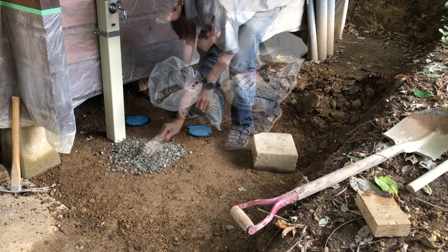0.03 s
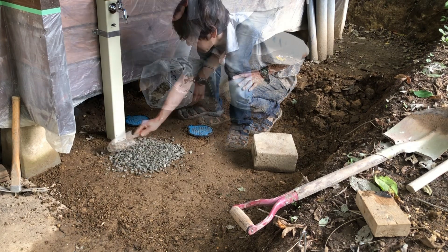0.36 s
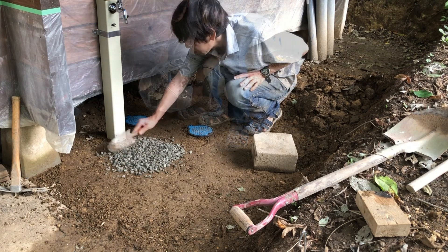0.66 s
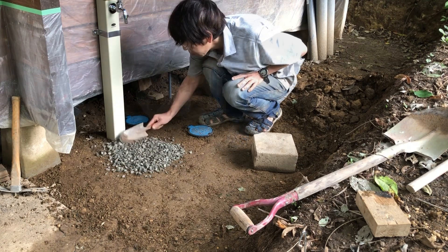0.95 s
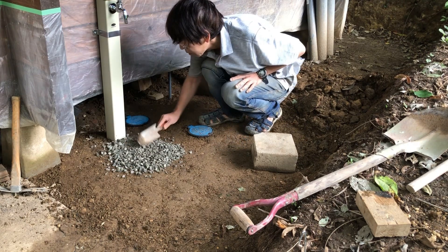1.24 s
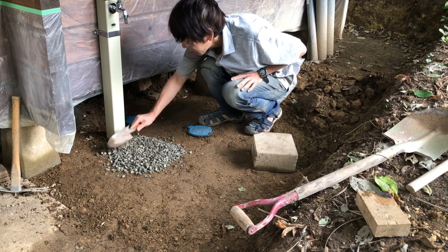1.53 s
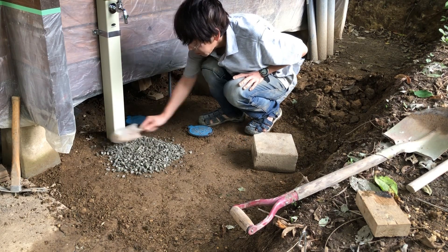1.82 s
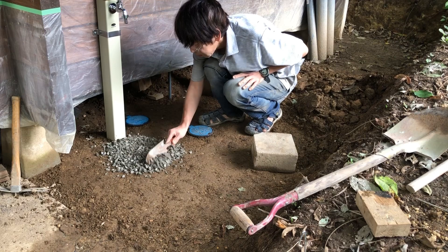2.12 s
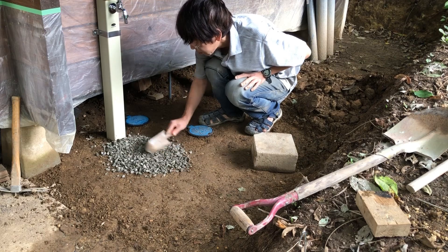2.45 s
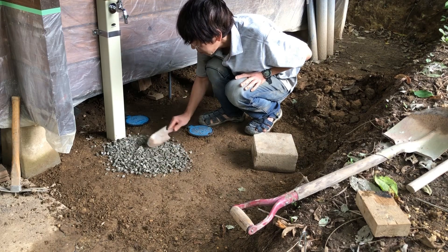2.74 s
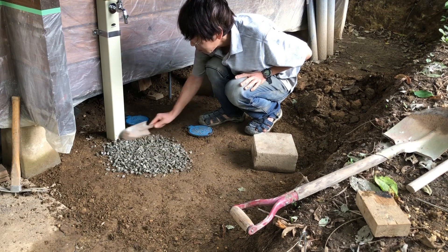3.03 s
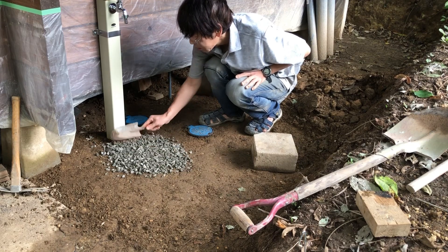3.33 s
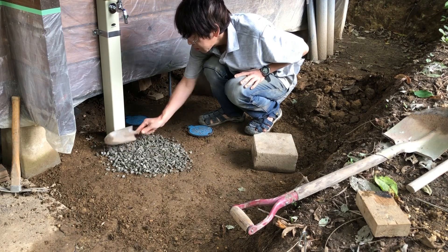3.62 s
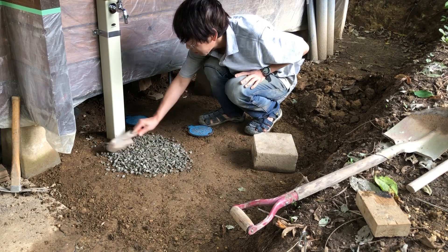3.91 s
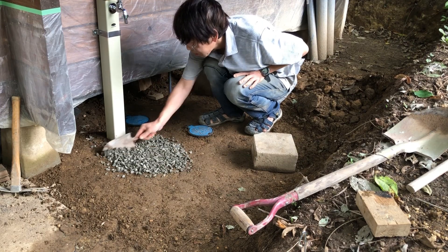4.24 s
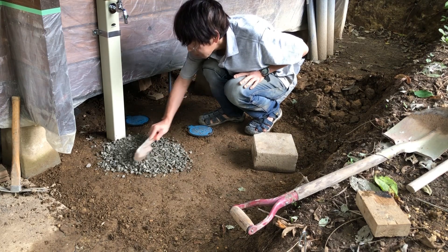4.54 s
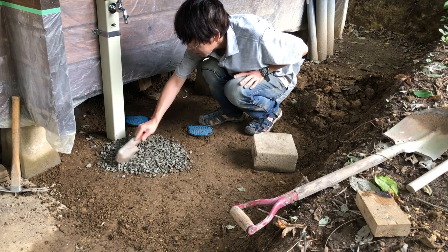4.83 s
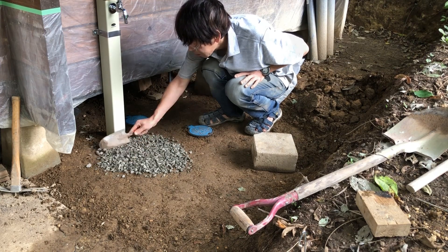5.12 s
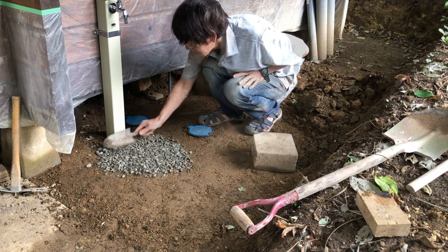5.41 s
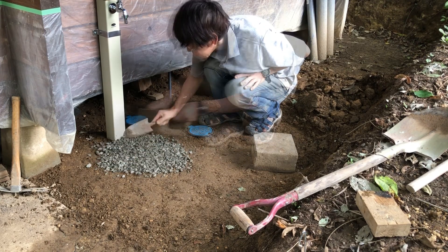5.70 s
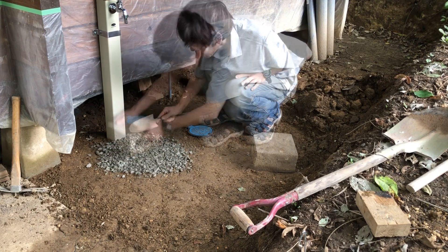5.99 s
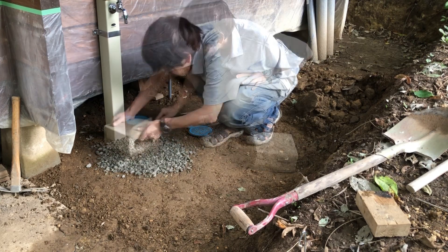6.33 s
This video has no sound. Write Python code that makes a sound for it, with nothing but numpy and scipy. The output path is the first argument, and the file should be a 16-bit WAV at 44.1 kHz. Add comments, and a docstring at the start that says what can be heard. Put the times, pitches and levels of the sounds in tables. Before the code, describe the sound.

Gravel crunches and clinks under repeated trowel strokes outdoors, with a few hollow knocks on a plastic post and one dull thud.

```python
"""Trowel spreading gravel

A steel hand trowel works a heap of crushed gravel beside a house wall, in quiet outdoor air.
Stones clack on the steel, then crunch in tiny avalanches while the dragged blade rings and chatters.
Grit trickles, soles shuffle, and now and then the trowel knocks a hollow plastic post.
The wall returns a short echo; near the end something heavy thuds on the soil."""
import sys
import numpy as np
from scipy import signal
from scipy.fft import rfft, irfft, next_fast_len
from scipy.io import wavfile
from scipy.ndimage import map_coordinates

SR = 44100
rng = np.random.default_rng(int(sys.argv[2]) if len(sys.argv) > 2 else 0)


def dump(signal):
    """Clip the signal to [-1, 1] and save it as 16-bit WAV at the path in sys.argv[1]."""
    limited = np.clip(np.atleast_2d(signal).T, -1, 1)
    pcm = np.round(limited * 32767).astype(np.int16)
    wavfile.write(sys.argv[1], SR, pcm)


N = 284886

# colour of the outdoor air: f/Hz, level/dB
AIR_COLOUR = [(20, -19), (40, -9.5), (65, 0.5), (120, 1), (200, -8), (400, -8.5), (800, -13), (1600, -16.5),
              (3000, -24), (8000, -40), (16000, -49)]
# decay of the yard's echo: f/Hz, t60/s
YARD_DECAY = [(100, 0.96), (500, 0.24), (3000, 0.25), (9000, 0.22), (16000, 0.22)]
# soles shifting on loose soil: t/s, length/s, level/dB
SOLE_SHIFTS = [(0.0, 0.081, -53), (.25, 0.23, -52), (0.51, .1, -51.5), (3.352, 0.075, -57),
               (4.815, 0.086, -60.5), (5.283, 0.13, -60.5)]
# colour of the shuffling: f/Hz, level/dB
SOLE_COLOUR = [(40, -25), (110, -4.5), (250, 4), (500, -6.5), (800, -1), (1300, 1), (2200, -6.5),
               (5000, -13), (16000, -19)]
# dull blows on the soil: t/s, shake level/dB, puff level/dB
SOIL_THUDS = [(6.129, -28.5, -38.5)]
# modes of the soil under a heavy blow: f/Hz, level/dB, t60/s
SOIL_MODES = [(59.7, -0.5, 0.46), (75, -1, 0.23), (112.6, -7, 0.17), (192, -25, 0.25)]
# the trowel hitting the post: t/s, level/dB, depth/dB, edge/dB
POST_KNOCKS = [(0.819, -36, -31, -7.5), (0.834, -40, -31, -5), (0.861, -32, -29, -11),
               (3.443, -9.5, -24.5, -34.5), (4.136, -15, -14.5, -27), (5.785, -30, -53, -6.5),
               (5.79, -26.5, -26, -11), (5.807, -21, -22.5, -24), (5.812, -27.5, -12.5, -26)]
# modes of the hollow post: f/Hz, level/dB, t60/s
POST_MODES = [(241.7, -9, 0.1), (302, -10.5, 0.11), (392, -11.5, 0.059), (606, -14, 0.056),
              (775, -0.5, 0.034), (1020, 0, 0.027), (1250, -7.5, 0.065), (1424, 5, 0.021), (1580, 2, 0.035)]
# colour of the post's loose rattle against the wall: f/Hz, level/dB
RATTLE_COLOUR = [(50, -48), (150, 1.5), (270, 11), (400, 4.5), (550, -15), (850, 7), (1150, -11),
                 (1700, -4), (2400, -16.5), (8000, -51)]
# colour of the trowel's edge catching the plastic: f/Hz, level/dB
EDGE_COLOUR = [(200, -34), (700, -35), (1150, 5.5), (1600, 8), (2400, -3.5), (3200, -9.5), (4500, -13),
               (7000, -19), (16000, -34)]
# modes of the steel blade: f/Hz, level/dB, t60/s
BLADE_MODES = [(1160, -14.5, 0.17), (1617, -12, 0.057), (1650, -15, 0.023), (2043, -7.5, 0.14),
               (2730, -31, 0.19), (3143, -15, 0.49), (3220, -2, 0.16), (3314, 0.5, 0.15), (3620, -16, 0.23),
               (3778, 3.5, 0.055), (3950, -14, 0.029), (4362, 9.5, 0.03), (4370, -3.5, 0.037),
               (5070, -3.5, 0.041), (7000, -11, .02), (8110, 2, 0.013), (9460, 5, 0.016)]
# colour of the blade flexing on the stones: f/Hz, level/dB
FLEX_COLOUR = [(300, -59.5), (900, -30), (1180, -9), (1450, -21), (1590, -1), (1665, 8), (1760, 2.5),
               (1880, -8), (2030, -11), (2400, -28), (5000, -52)]
# steel striking single large stones: t/s, level/dB, brightness/dB
STONE_HITS = [(.169, -17, -5), (.3586, -19.5, -26), (.6577, -8, -12), (.67, -16, -2.5), (.7108, -12, -6),
              (.9068, -16.5, -8.5), (.9401, -8.5, -15), (1.0382, -7, -41), (1.1356, -25, -3),
              (1.2373, -17, -4.5), (1.3172, -14, -6.5), (1.3458, -19, -14), (1.4666, -13, -10),
              (1.513, -11, -19), (1.5315, -13, -19), (1.6357, -31.5, -9), (1.7609, -14, -2),
              (1.8218, -2.5, -12.5), (1.8277, -3.5, -16), (2.0441, -1.5, -9), (2.1595, -17, -11),
              (2.2989, -16, -8.5), (2.366, -19.5, -4.5), (2.395, -21, -4.5), (2.4457, -11, -5),
              (2.4876, -19, -1.5), (2.516, -11, -16), (2.5483, -11, -2), (2.5867, -13, -19),
              (2.809, -8.5, -13), (2.849, -19, -7), (2.8683, -3, -12), (2.9102, -7.5, -20),
              (2.9622, -18, -13), (3.043, -26, -24), (3.0572, -20, -10), (3.2268, -17, -29),
              (3.3183, -22, -17), (3.3338, -13.5, -18), (3.481, -15.5, -10.5), (3.5597, -19.5, -2.5),
              (3.5855, -20.5, -2.5), (3.8416, -16, -4.5), (3.9262, -4.5, -10.5), (3.9614, -16.5, -7),
              (4.1914, -11.5, -13), (4.5865, -14.5, -5), (4.5919, -17.5, -3.5), (4.9202, -5.5, -12.5),
              (4.9894, -3.5, -24), (5.017, -10.5, -10.5), (5.0528, -15, -31), (5.0767, -23, -16),
              (5.1012, -13.5, -14.5), (5.1692, -12.5, -32), (5.4042, -11.5, -35), (5.4209, -12, -10),
              (5.438, -6.5, -10.5), (5.6415, -14, -30), (5.67, -15, -33), (5.7225, -18.5, -4),
              (6.115, -17.5, -2.5), (6.1872, -20.5, -2.5)]
# colour of the clacks: f/Hz, level/dB
CLACK_COLOUR = [(100, -27), (600, -22), (1300, -10.5), (2400, -11), (3300, -2.5), (4200, -1.5),
                (6000, -1.5), (8000, -4), (11000, -4.5), (16000, -11)]
# drags through the heap: t/s, length/s, opening level/dB, closing level/dB, chatter over crunch/dB
DRAGS = [(0.0, .07, -45.5, -50.5, -0.5), (.075, .375, -38.5, -40.5, -10), (0.657, .12, -30.5, -38.5, -11.5),
         (.906, .19, -38, -41.5, -7), (1.142, .08, -36, -43, -5.5), (1.317, .235, -39.5, -30, -15.5),
         (1.757, .08, -29.5, -34.5, -11.5), (2.042, .19, -35, -38, -14), (2.268, .325, -44.5, -27, -13),
         (2.607, .065, -38, -38, -7), (2.806, .16, -41.5, -41, -4), (3.041, .095, -41.5, -32.5, -5),
         (3.218, .12, -38, -42, -2), (3.473, .06, -41, -39, -2.5), (3.55, .088, -33.5, -39.5, -4),
         (3.831, .075, -46.5, -35.5, -6.5), (3.923, .075, -29, -34, -9), (4.185, .17, -36, -35, -2.5),
         (4.386, .18, -43, -51, -4.5), (4.587, .18, -39.5, -36, -9.5), (4.918, .19, -35, -36, -4.5),
         (5.163, .03, -40, -38, 0), (5.406, .062, -42, -32.5, -0.5), (5.641, .16, -38.5, -37.5, -5.5),
         (5.879, .1, -56.5, -44.5, 3), (6.11, .012, -24, -43, -25), (6.187, .03, -47, -45, 0.5),
         (6.322, .025, -39, -45, -7.5), (6.404, 0.016, -50, -59, 2)]
# colour of the crunch: f/Hz, level/dB
CRUNCH_COLOUR = [(60, -30), (200, -11.5), (600, -11.5), (1200, -8), (1800, -7.5), (2500, -8.5),
                 (3300, -2.5), (4300, -2), (5500, 0.5), (7500, -6), (10000, -4.5), (16000, -9.5)]

TOP_HZ = 16000  # ceiling of the grains and of the mix
SOLE_RAMP_S = 0.017  # a sole takes up or gives back its weight
SMALL_OVER_CRUNCH_DB, SMALL_SCATTER_DB, SMALL_BRIGHT_DB = 11, 0.5, -13.5  # lesser stones in a drag
RING_DB, RING_GROWS = -29.5, 0.58  # the free blade's ring, and its dB per dB of blow
FLEX_DB, FLEX_GROWS = -35, .5  # the blade's flex, and its dB per dB of blow
BURIED_DB, BURIED_T60_S = -5.5, .5  # extra damping of a blow's ring inside the heap
BITE_S = .003  # the blade sinks in
STOP_DB_PER_S, LIFT_DB_PER_S = 363, 482  # release of the crunch and of the chatter as the blade lifts
SETTLE_DB, SETTLE_DB_PER_S = -21.5, 124  # a few stones keep sliding for longer


def amp(db):
    """Decibels to gain."""
    return 10 ** (np.asarray(db) / 20)


def unit(x):
    """Scale to rms 1."""
    return x / np.sqrt(np.mean(x ** 2) + 1e-20)


def fade(t, t60):
    """A decay that loses 60 dB in t60 seconds."""
    return np.exp(-np.log(1000) * t / t60)


def along(points, hz):
    """Read a curve of (f/Hz, value) points on a log frequency axis."""
    f, value = np.transpose(points)
    return np.interp(np.log(hz + 1), np.log(f), value)


def wobble(rate):
    """A smooth random curve with rate knots a second."""
    knots = rng.standard_normal(int(N * rate / SR) + 4)
    return map_coordinates(knots, [np.arange(N) * rate / SR])


def add(track, s, sound):
    """Mix a sound into the track at s seconds."""
    start = max(round(s * SR), 0)
    track[start:start + len(sound)] += sound[:N - start]


def filtered(x, kind, hz, order=1):
    """A gentle Butterworth low, high or band pass."""
    return signal.sosfilt(signal.butter(order, hz, kind, fs=SR, output="sos"), x)


def coloured(x, colour, size=4096):
    """Minimum-phase EQ that keeps attacks sharp; white noise holds its level."""
    gain = unit(amp(along(colour, np.fft.rfftfreq(size, 1 / SR))))
    cepstrum = irfft(np.log(gain))
    cepstrum[1:size // 2] *= 2
    cepstrum[size // 2 + 1:] = 0
    return signal.fftconvolve(x, irfft(np.exp(rfft(cepstrum))))[:len(x)]


def burst(t, t60):
    """A decaying burst of white noise."""
    return rng.standard_normal(len(t)) * fade(t, t60)


def ring(modes, t, scatter_db):
    """Decaying modes, struck with new strengths and signs at every blow."""
    hz, db, t60 = np.transpose(modes)[:, :, None]
    strength = amp(db + scatter_db * rng.standard_normal(hz.shape)) * rng.choice([-1, 1], hz.shape)
    return np.sum(strength * np.sin(2 * np.pi * hz * t) * fade(t, t60), axis=0)


def grains(rate, spread_db, t60, size=512):
    """Small stone-on-stone clinks of random pitch and size, rms 1."""
    when, pitch, rank, length = rng.random((int(rate * N / SR), 4)).T[:, :, None]
    t = np.arange(size) / SR
    strength = amp(-spread_db * np.log(rank + 0.024))
    ticks = strength * np.sin(2 * np.pi * pitch * TOP_HZ * t) * fade(t, t60 * (.5 + length))
    positions = (when * N).astype(int) + np.arange(size)
    return unit(np.bincount(positions.ravel(), ticks.ravel(), N + size)[:N])


def slips(rate, spread_db, t60):
    """Friction force of rms 1: stones catch and give way in small avalanches."""
    when, rank = rng.random((int(rate * N / SR), 2)).T
    strength = amp(-spread_db * np.log(rank + 0.059))
    energy = np.bincount((when * N).astype(int), strength ** 2, N)
    return unit(np.sqrt(signal.lfilter([1], [1, -fade(1 / SR, t60) ** 2], energy)))


def outdoor_air():
    """A quiet bed of air with a slowly swelling distant rumble."""
    swell_db = 1.2 * wobble(3)
    return amp(-57.5 + swell_db) * unit(coloured(rng.standard_normal(N), AIR_COLOUR))


def yard_echo(x):
    """The wall and the ground return a short, diffuse echo."""
    hz, t, noise = signal.stft(rng.standard_normal(SR // 2), SR, nperseg=256)
    envelope = fade(t, along(YARD_DECAY, hz)[:, None]) * (1 - fade(t, 0.0037))
    tail = signal.istft(noise * envelope, SR)[1]
    return signal.fftconvolve(x, tail / np.linalg.norm(tail))[:N]


def trickle():
    """Fine grit keeps settling, a faint fizz under the strokes."""
    flow = slips(rate=1200, spread_db=10, t60=0.031)
    specks = flow * grains(rate=4300, spread_db=-3, t60=0.0027)
    return amp(-64.5) * unit(coloured(specks, CRUNCH_COLOUR))


def shuffling():
    """Soles grind softly over the soil as the crouching worker shifts weight."""
    t = np.arange(N) / SR
    weight = np.zeros(N)
    for s, length, db in SOLE_SHIFTS:
        corners = [s, s + SOLE_RAMP_S, s + length, s + length + SOLE_RAMP_S]
        weight += amp(db) * np.interp(t, corners, [0, 1, 1, 0])
    grind = slips(rate=250, spread_db=4, t60=0.063) * rng.standard_normal(N)
    return weight * coloured(grind, SOLE_COLOUR)


def thuds():
    """A heavy, soft blow packs the loose soil with a puff, then shakes the ground."""
    ground = np.zeros(N)
    t = np.arange(SR // 2) / SR
    puff_colour = [(60, -8), (200, -1.5), (450, -7), (1000, -17.5), (4000, -29)]  # f/Hz, level/dB
    for s, shake_db, puff_db in SOIL_THUDS:
        shake = ring(SOIL_MODES, t, scatter_db=3) * (1 - fade(t, 0.014))
        puff = coloured(burst(t, 0.23), puff_colour)
        add(ground, s, amp(shake_db) * shake)
        add(ground, s - .013, amp(puff_db) * puff)
    return ground


def knocks():
    """The plastic post answers the trowel with a dull, hollow tock; deep blows reach its low modes."""
    post = np.zeros(N)
    t = np.arange(SR // 2) / SR
    for s, db, depth_db, edge_db in POST_KNOCKS:
        modes = ring(POST_MODES, t, scatter_db=1)
        rattle = coloured(burst(t, 0.27), RATTLE_COLOUR)
        tock = modes + 0.17 * rattle
        low = filtered(tock, "band", [180, 700], order=2)
        high = filtered(tock, "high", 700)
        body = amp(.5 * (depth_db + 14)) * high - amp(depth_db + 21) * low
        edge = amp(edge_db + 18) * coloured(burst(t, 0.082), EDGE_COLOUR)
        steel = amp(-30.5) * ring(BLADE_MODES[4:], t, scatter_db=1)  # the trowel's upper modes
        add(post, s + 0.00212, amp(db - 8) * (body + edge + steel))
    return post


def bent(x, swing_s):
    """Changing pressure on the blade makes its pitch wander."""
    return map_coordinates(x, [np.arange(N) + swing_s * SR * wobble(14)])


def strokes():
    """Crunch, chatter and blade-in-heap envelopes: each drag bites, swells or eases, then settles."""
    crunch_power, chatter_power, buried = np.zeros((3, N))
    age = np.arange(SR) / SR
    for s, length, first_db, last_db, chatter_db in DRAGS:
        bite = np.clip(age / BITE_S, 0, 1)
        effort = amp(np.interp(age, [0, length], [first_db, last_db])) * bite
        lifted = np.maximum(age - length, 0)
        settling = np.maximum(amp(-STOP_DB_PER_S * lifted), amp(SETTLE_DB - SETTLE_DB_PER_S * lifted))
        add(crunch_power, s, (effort * settling) ** 2)
        add(chatter_power, s, (effort * amp(chatter_db - LIFT_DB_PER_S * lifted)) ** 2)
        add(buried, s, age < length)
    crunch_db = 10 * np.log10(crunch_power + 1e-12)
    chatter_db = 10 * np.log10(chatter_power + 1e-12)
    return crunch_db, chatter_db, np.minimum(buried, 1)


def small_stones(crunch_db, buried, count):
    """Cues for light clacks scattered along the drags; a harder drag strikes them harder."""
    progress = (np.arange(count) + rng.random(count)) / count
    at = np.searchsorted(np.cumsum(buried), progress * buried.sum()).clip(0, N - 1)
    level_scatter, bright_scatter = rng.standard_normal((count, 2)).T
    db = crunch_db[at] + SMALL_OVER_CRUNCH_DB + SMALL_SCATTER_DB * level_scatter
    return list(zip(at / SR, db, SMALL_BRIGHT_DB + 4 * bright_scatter))


def stone_crack(t, bright_db):
    """One stone cracks against the steel and jostles its neighbours within milliseconds."""
    force = fade(t, 0.015) + 0.14 * fade(t, 0.08)
    for lag, share in zip(rng.uniform(0.0022, 0.012, size=2), rng.random(2)):
        force += 0.18 * share * (t > lag) * fade(np.abs(t - lag), 0.011)
    pings = ring([(hz, 0, .012) for hz in rng.uniform(5350, 12070, size=3)], t, scatter_db=4)
    # where the stone meets the blade sets the pitch of the clink
    clink = ring([(hz, 0, .022) for hz in rng.uniform(3620, 4660, size=2)], t, scatter_db=5.5)
    # a blunt contact trades its treble for a rounder clink
    bluntness = amp(np.clip(-.35 * (bright_db + 7.5), -5, 7))
    attack = 1 - fade(t, 0.0049)
    crack = attack * (force * rng.standard_normal(len(t)) + .15 * pings + 0.16 * bluntness * clink)
    dull = filtered(crack, "low", 5500)
    return dull + amp(1.025 * (bright_db + 12)) * (crack - dull)


def clacks(blows, buried):
    """Each struck stone flexes the blade and leaves it ringing, softer and shorter inside the heap."""
    stones, steel, flex = np.zeros((3, N))
    t = np.arange(SR // 5) / SR
    for s, db, bright_db in blows:
        add(stones, s + 0.00046, amp(db - 9) * stone_crack(t, bright_db))
        in_heap = buried[round(s * SR):][:SR // 100].any()
        damping = amp(BURIED_DB) * fade(t, BURIED_T60_S) if in_heap else 1
        ringing = damping * ring(BLADE_MODES, t, scatter_db=3.5)
        add(steel, s + .0005, amp(RING_DB + RING_GROWS * db) * ringing)
        add(flex, s, amp(FLEX_DB + FLEX_GROWS * db) * burst(t, 0.03))
    blade = steel + coloured(flex, FLEX_COLOUR)
    return coloured(stones, CLACK_COLOUR) + bent(blade, swing_s=.00008)


def scraping(crunch_db, chatter_db):
    """The dragged blade shoves stones over each other, sings with them and chatters on them."""
    force = slips(rate=750, spread_db=3, t60=0.022)
    snaps = grains(rate=120, spread_db=9, t60=0.0021)  # sharp corners chip off
    clinks = grains(rate=4000, spread_db=3, t60=0.011)
    grind = force * unit(clinks + 0.5 * rng.standard_normal(N))
    contacts = amp(crunch_db) * (grind + 0.19 * snaps)
    # a lighter stroke gives a duller crunch
    dull = filtered(contacts, "low", 7000)
    treble = amp(np.clip(0.19 * (crunch_db + 29), -3, 3))
    drive = dull + treble * (contacts - dull)
    t = np.arange(SR // 3) / SR
    steel = ring(BLADE_MODES, t, scatter_db=3.5) * fade(t, 0.12)  # the heap damps the blade
    singing = signal.fftconvolve(drive, steel / np.linalg.norm(steel))[:N]
    # the blade flexes in short swells as it rides over stones, less so under light pressure
    riding = unit(amp(2.5 * wobble(55)) * force)
    pressed = amp(np.clip(1.1 * (chatter_db + 47.5), -9, 0))
    chatter = coloured(riding * pressed * rng.standard_normal(N) * amp(chatter_db), FLEX_COLOUR)
    blade = amp(-8.5) * singing + amp(-0.86) * chatter
    return amp(-2.5) * coloured(drive, CRUNCH_COLOUR) + bent(blade, swing_s=0.000215)


def scene():
    """Trowel, gravel and post in the open yard, in mono."""
    crunch_db, chatter_db, buried = strokes()
    blows = list(STONE_HITS) + small_stones(crunch_db, buried, count=36)
    work = scraping(crunch_db, chatter_db) + clacks(blows, buried) + knocks() + trickle() + shuffling()
    return (work + amp(-11) * yard_echo(work) + thuds() + outdoor_air())[None]


def record(dry):
    """Master EQ: roll off the deepest rumble and cut everything above TOP_HZ."""
    thinned = filtered(dry, "high", 31, order=2)
    size = next_fast_len(N + SR // 2)
    passband = np.fft.rfftfreq(size, 1 / SR) < TOP_HZ
    return irfft(rfft(thinned, size) * passband, size)[:, :N]


dry = scene()
out = record(dry)
dump(out)
```